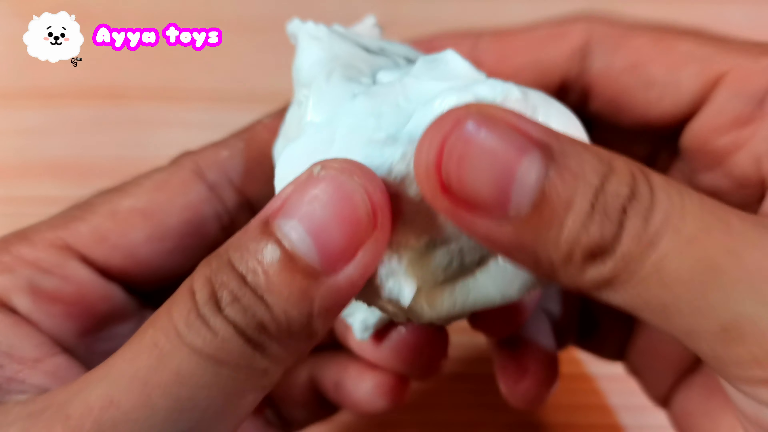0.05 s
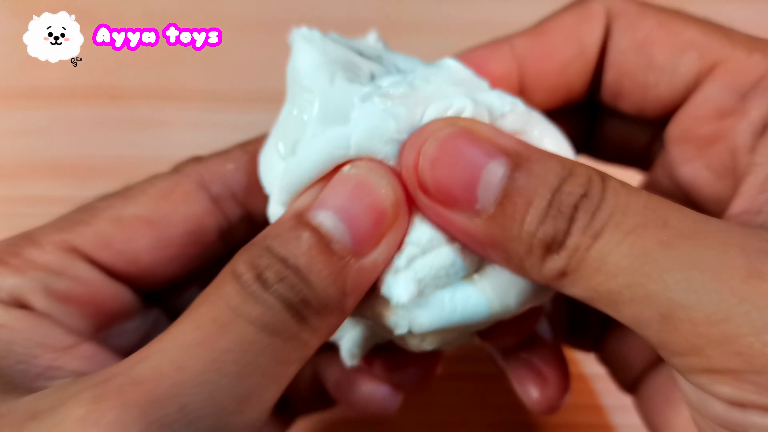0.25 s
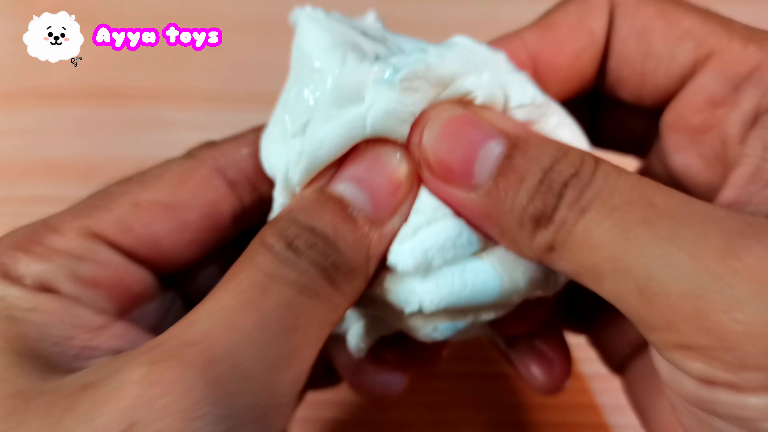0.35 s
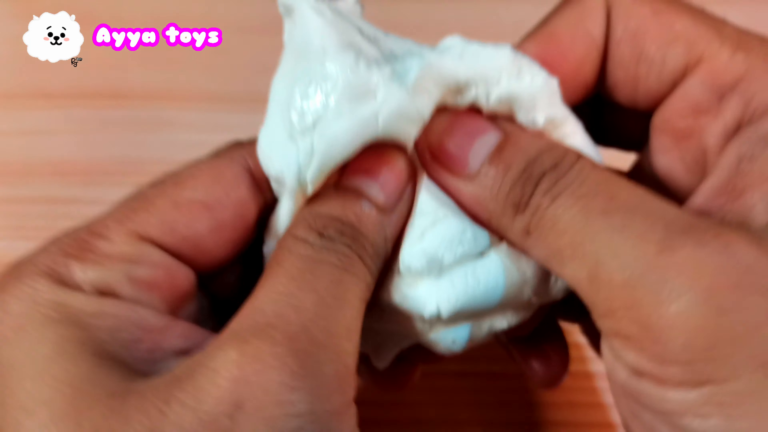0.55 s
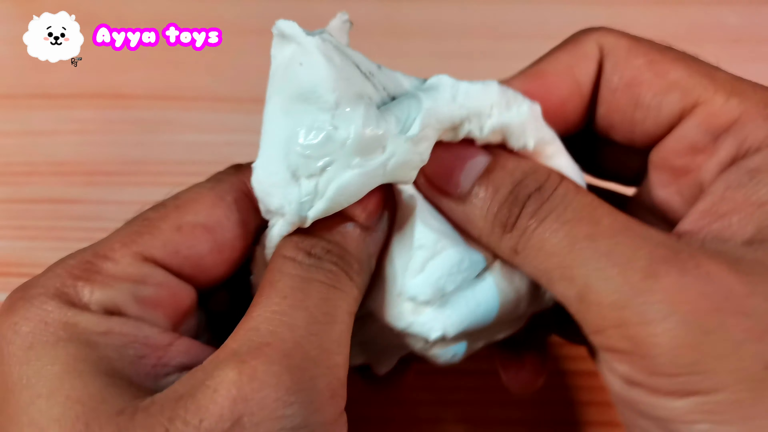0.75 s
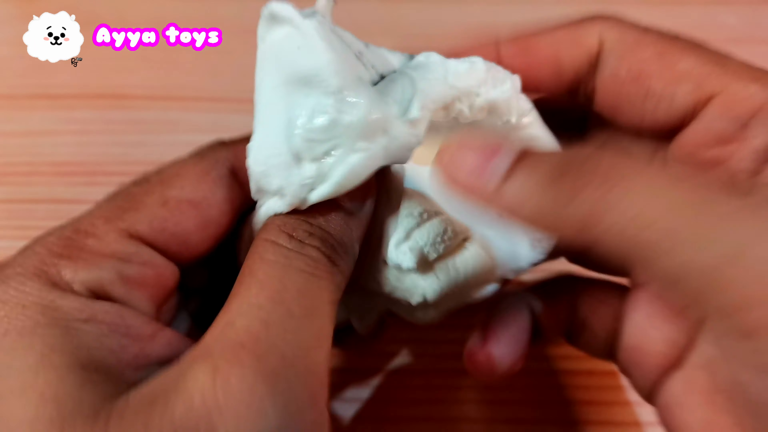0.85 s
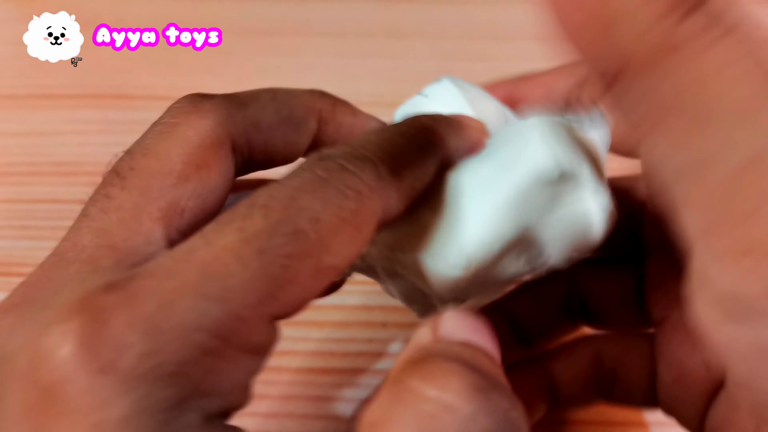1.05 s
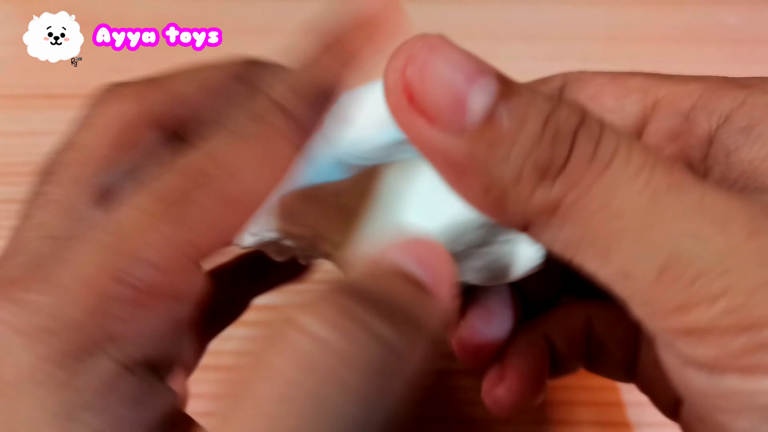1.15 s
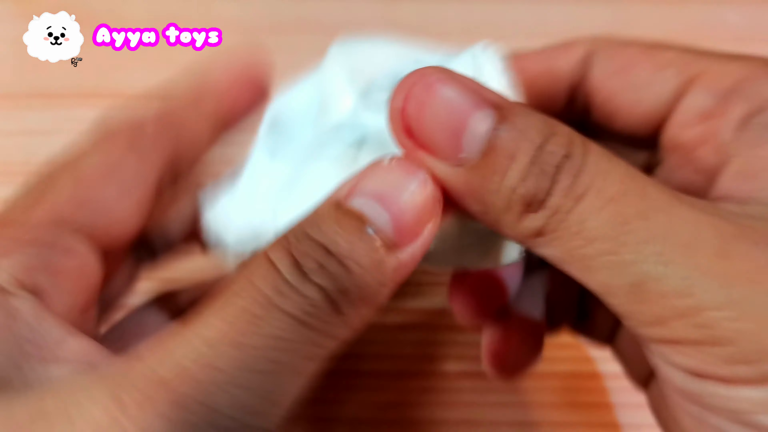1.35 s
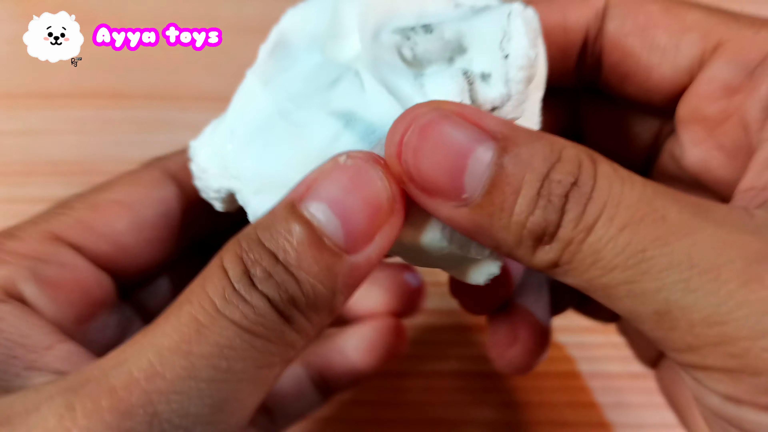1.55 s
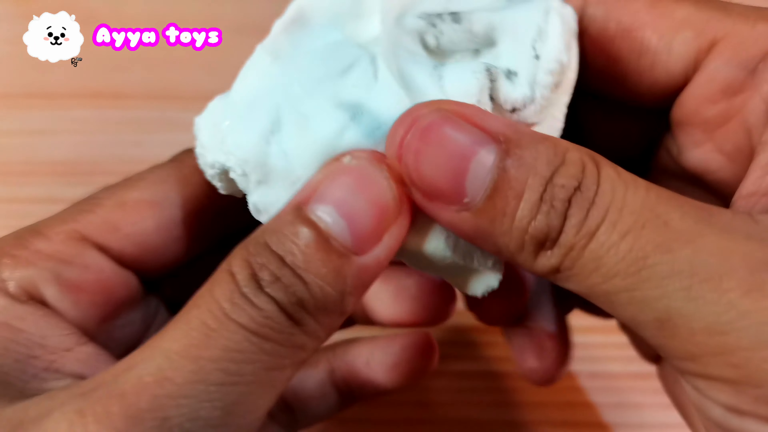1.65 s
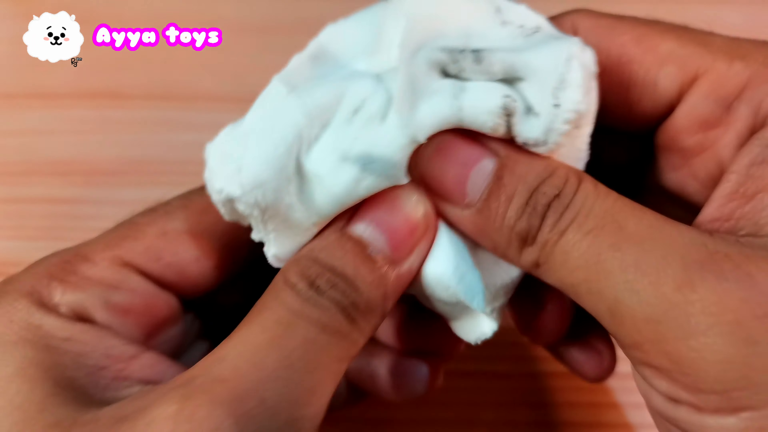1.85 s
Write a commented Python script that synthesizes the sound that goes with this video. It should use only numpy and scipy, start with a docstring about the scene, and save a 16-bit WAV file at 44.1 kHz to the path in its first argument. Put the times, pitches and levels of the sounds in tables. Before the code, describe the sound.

Fingers squeeze and fold soft, sticky clay close to the microphone in a small room. Low bumps give way to a cluster of sharp air pops and crackles, then brief swishes of skin and a few lighter clicks.

```python
"""Soft low bumps over a faint hum and hiss give way to sharp pops: fingers are squeezing and folding
a lump of soft, sticky clay, close by and a little to the left. Trapped air pockets burst and ring as
damped cavity resonators, tiny ones crackle, and skin rubs and peels on the clay as the grip changes.
The hands and a small room reflect each pop."""
import sys
import numpy as np
from scipy import signal
from scipy.fft import rfft, irfft, next_fast_len
from scipy.io import wavfile
from scipy.ndimage import map_coordinates

SR = 44100
rng = np.random.default_rng(int(sys.argv[2]) if len(sys.argv) > 2 else 0)


def wav_record(signal):
    """Record a signal, one row per channel, as 16-bit PCM in the file named by sys.argv[1]."""
    frames = np.transpose(np.atleast_2d(signal))
    bounded = np.clip(frames, -1, 1)
    # unit amplitude maps onto the largest positive 16-bit level
    quanta = np.round(bounded * 32767).astype(np.int16)
    wavfile.write(sys.argv[1], SR, quanta)


N = 83790

# Spectra of the noises. Each row: frequency in Hz, relative level in dB.
RUMBLE_SPECTRUM = [(20, 0), (38, 5.5), (60, 0.5), (80, -2.5), (110, 1), (170, -10.5), (250, -12.5),
                   (400, -26.5), (800, -21.5), (2000, -24.5), (4000, -38), (7000, -44), (16000, -31)]
KNEAD_SPECTRUM = [(60, -30), (150, -12), (210, -4), (255, 5), (315, -5), (410, 1), (540, -7), (900, -15),
                  (2000, -30), (6000, -60)]
SWIPE_SPECTRUM = [(100, -30), (400, -8), (750, 0), (1600, -1), (3400, -3), (4250, 4), (5200, -5),
                  (9000, -3), (15000, -10)]
RUSTLE_SPECTRUM = [(100, -30), (400, -8), (800, -2), (2500, 0), (4300, 0), (5500, -5), (10000, -6),
                   (15000, -13)]
CRACKLE_SPECTRUM = [(200, -30), (1000, -9), (2500, 0), (4300, 0), (5500, -3), (10000, -4), (15000, -11)]
# Tones of the hum. Each row: frequency in Hz, mean level in dB.
HUM_TONES = [(100.5, -64), (122, -65.5)]
# Reverberation of the room. Each row: frequency in Hz, time to decay by 60 dB in seconds.
ROOM_DECAY = [(300, 0.64), (2500, .22), (8000, 0.25), (15000, 0.19)]
# Phase of the direct sound on the right. Each row: frequency in Hz, lag in radians.
RIGHT_PHASE_LAG = [(300, -1), (700, -1), (1100, 1.8), (1700, 1.5), (2500, 1.77), (3000, 1.6), (3500, 4),
                   (4400, 7), (5500, 4.5), (7000, 8.5), (15000, 18)]
# Shifts of grip. Each row: midpoint in seconds, half length in seconds, level in dB, frequency in Hz.
GRIP_BUMPS = [(0.048, 0.032, -52, 90), (0.11, 0.039, -49, 46), (0.445, 0.035, -51, 55),
              (0.774, .025, -49.5, 135), (0.956, 0.067, -59, 139), (1.242, .04, -54, 113),
              (1.367, 0.057, -50.5, 96), (1.56, 0.047, -51.5, 39.5), (1.815, 0.024, -48.5, 65)]
# Envelopes of the low creak and the sticky crackling. Each row: time in seconds, level in dB.
KNEAD_ENVELOPE = [(0, -61.5), (.3, -63.5), (.38, -49.5), (.5, -50), (.6, -61), (.72, -80), (.77, -58.5),
                  (.84, -63), (.95, -63), (1.1, -61), (1.28, -60), (1.5, -63.5), (1.7, -57.5), (1.9, -62.5)]
RUB_ENVELOPE = [(0, -72), (.2, -70.5), (.255, -65.5), (.3, -69), (.38, -56), (.41, -54.5), (.5, -51.5),
                (.58, -59), (.66, -62), (.74, -51), (.8, -68), (.9, -73), (.95, -47), (1, -58),
                (1.025, -64), (1.08, -52), (1.115, -66.5), (1.16, -67.5), (1.265, -64), (1.31, -69),
                (1.45, -75), (1.77, -66.5), (1.82, -60.5), (1.9, -58)]
# Fingertip slides. Each row: peak time, rise width and fall width in seconds, level in dB.
FINGER_SWIPES = [(0.925, 0.0089, 0.0053, -52.5), (.947, .012, 0.014, -37), (0.999, 0.011, 0.02, -43.5),
                 (1.046, 0.0073, 0.021, -42.5), (1.262, 0.0046, 0.012, -46.5), (1.5, 0.033, 0.022, -63),
                 (1.683, 0.0041, 0.0023, -49)]
# The lump giving way. Each row: start in seconds, gain in dB, resonance in Hz.
LUMP_THUDS = [(.4272, -32, 920), (.4802, 10, 900), (.5346, 11, 810), (.5515, 2, 910), (.568, 2, 910),
              (0.9531, 1.5, 1110), (1.0023, -0.5, 835), (1.0475, -20, 775), (1.2649, 4.5, 870)]
# Bursting air pockets. Each row: time in seconds, ring gain in dB, ring frequency in Hz, ring Q,
# snap gain in dB, snap frequency in Hz.
AIR_POCKETS = [(0.2114, 5.5, 1920, 6.1, -2.5, 10500), (.212, 4, 4200, 6.2, -20, 9000),
               (.2217, -29, 2500, 2, -20, 7900), (.3278, -11.5, 2300, 2.1, -5, 8250),
               (0.334, -12.5, 2570, 1.2, -29, 8000), (0.3487, 1.5, 2560, 0.82, -12, 12600),
               (0.4056, -7.5, 2930, 1.6, -29, 8950), (0.4109, -9, 2370, 2.4, -7, 7900),
               (0.4163, -8, 3040, 1.6, -10, 8800), (0.4194, -6, 3000, 2.6, -31, 8000),
               (.4272, 5.5, 2420, 0.41, 4, 7220), (.4605, -6, 3000, 1.3, -11, 7400),
               (0.4638, 9.5, 3240, 2.8, -16, 7440), (.4711, 13, 3130, 4.2, -28, 6000),
               (0.4804, 20.5, 2380, 2.1, -36, 6000), (0.4931, 1, 3000, 2.5, -15, 8000),
               (0.4998, 1.5, 3540, 2.7, -15.5, 7600), (.5029, 10, 4070, 4.1, 3.5, 6900),
               (0.5078, 5.5, 2770, 0.67, -10, 7160), (0.5347, 24.5, 2710, 4.3, -2, 7500),
               (0.5514, 20.5, 2920, 2.8, 6.5, 5500), (.568, 10.5, 3900, 3.4, -4, 6700),
               (0.6367, -1.5, 2700, 2.6, -18, 6500), (0.6621, -15, 3000, 2, -10, 7750),
               (0.6922, 12, 8820, 3.7, -17, 8360), (0.7152, -8.5, 2890, 1.8, -6, 6640),
               (.7186, 13, 2920, 4.4, -2.5, 6600), (0.7569, -1, 5840, 3.3, -20, 6940),
               (0.8153, -7.5, 4300, 3.9, -14, 6500), (0.9435, 1, 2370, 1.5, -3, 7150),
               (0.953, 3, 4300, 2.8, -25, 8000), (0.9672, -6, 3500, 2, -16, 6960),
               (0.994, -12, 2140, 1.1, -36, 6000), (1.0001, -1, 2160, 1.23, -24, 4640),
               (1.0435, -6, 2500, 1.9, -14, 6140), (1.0475, -3, 2040, 1.14, -23, 6300),
               (1.0743, -14, 4260, 2.5, -16, 6900), (1.0935, -14.5, 4600, 1.8, -29, 7760),
               (1.2624, -10.5, 1560, 0.5, -29, 6100), (1.2841, -18, 3920, 6, -22.5, 7300),
               (1.512, -20.5, 3350, 5.9, -37, 8100), (1.8074, -16.5, 2780, 1.2, -22.5, 7400),
               (1.8308, -13, 2700, 4, -49, 8000), (1.8488, -6, 2510, 3.2, -40, 7750),
               (1.8553, 0.5, 3020, 0.97, -14.5, 8400), (1.8989, 1.5, 2400, 4.3, -9.5, 7400)]


def amp(db):
    """Amplitude ratio of a level in decibels."""
    return 10 ** (np.asarray(db) / 20)


def unit_rms(x):
    """Normalisation to a mean power of 1."""
    return x / np.sqrt(np.mean(x ** 2) + 1e-20)


def at_frequency(points, hz):
    """Interpolation on a logarithmic frequency axis."""
    f, values = np.transpose(points)
    return np.interp(np.log(hz + 1), np.log(f + 1), values)


def envelope(rows):
    """Gain per sample, interpolated linearly in decibels."""
    return amp(np.interp(np.arange(N) / SR, *np.transpose(rows)))


def wobble(rate):
    """Random modulation: a spline through `rate` Gaussian values a second."""
    return map_coordinates(rng.standard_normal(N // 20), [np.arange(N) * rate / SR])


def filtered(x, response):
    """Linear filtering: the spectrum is multiplied by a frequency response."""
    size = next_fast_len(N + SR // 2)
    return irfft(rfft(x, size) * response(np.fft.rfftfreq(size, 1 / SR)), size)[..., :N]


def coloured(x, spectrum):
    """Spectral shaping, normalised to rms 1."""
    return unit_rms(filtered(x, lambda hz: amp(at_frequency(spectrum, hz))))


def stereo_noise(apart, left_db):
    """Partial coherence: white noise mixed from a shared and an opposed part, louder on the left."""
    mid, side = rng.standard_normal((2, N))
    return unit_rms(np.array([amp(left_db) * (mid + apart * side), mid - apart * side]))


def background(hiss_hz=2720, hiss_sigma_hz=127):
    """Superposition of room rumble, a hum wavering in level and phase, and narrow-band hiss."""
    t = np.arange(N) / SR
    rumble = amp(-56.5) * coloured(stereo_noise(apart=.36, left_db=6), RUMBLE_SPECTRUM)
    hum = np.zeros(N)
    for hz, db in HUM_TONES:
        peak = np.sqrt(2) * amp(db + 4.7 * wobble(4.84))
        hum += peak * np.sin(2 * np.pi * hz * t + .45 * wobble(6.4))
    noise = stereo_noise(apart=.79, left_db=1)
    hiss = unit_rms(filtered(noise, lambda f: np.exp(-.5 * ((f - hiss_hz) / hiss_sigma_hz) ** 2)))
    return rumble + hum * amp([[2.1], [-2.1]]) + amp(-61.5) * hiss


def reverberation(x):
    """Convolution with the room's diffuse tail, in which each frequency decays at its own rate."""
    hz, t, noise = signal.stft(rng.standard_normal((2, SR // 3)), SR, nperseg=256)
    decay = amp(-60 * t / at_frequency(ROOM_DECAY, hz)[:, None])
    tail = signal.istft(noise * decay, SR, nperseg=256)[1]
    delayed = np.pad(x, (90, 0))  # the room answers 2 ms later
    return signal.fftconvolve(delayed[None], tail / np.linalg.norm(tail[0]), axes=1)[:, :N]


def hand_paths(x, palm_delay_s=.000422, scatter_t60_s=.010, taps=1500):
    """Interference of direct sound, a palm echo on the left and random scatter off the fingers."""
    size = len(x) + taps
    f = np.fft.rfftfreq(size, 1 / SR)
    scatter = rng.standard_normal((2, taps)) * amp(-60 * np.arange(taps) / SR / scatter_t60_s)
    scatter = rfft(scatter / np.linalg.norm(scatter, axis=1, keepdims=True), size)
    left = 1 + .13 * np.exp(-2j * np.pi * f * palm_delay_s)
    right = amp(-12) * np.exp(-1j * at_frequency(RIGHT_PHASE_LAG, f))
    paths = np.array([left, right]) + amp([[-8], [-6.5]]) * scatter
    return irfft(rfft(x, size) * paths)


def bumps(sigma_octaves=.31):
    """Handling noise: each shift of the hands is a flat-topped pulse of low band-pass noise."""
    t, out = np.arange(N) / SR, np.zeros((2, N))
    noise = stereo_noise(apart=.3, left_db=7)
    for middle, half_length, db, hz in GRIP_BUMPS:
        band = filtered(noise, lambda f: np.exp(-.5 * (np.log2((f + 1) / hz) / sigma_octaves) ** 2))
        out += amp(db) * np.exp(-((t - middle) / half_length) ** 4) * unit_rms(band)
    return out


def kneading():
    """Deformation: the mass shifts under the thumbs with a low, uneven creak."""
    creak = coloured(stereo_noise(apart=.42, left_db=3.5), KNEAD_SPECTRUM)
    return envelope(KNEAD_ENVELOPE) * creak * amp(1.5 * wobble(40))


def swipes():
    """Sliding friction: fingertips move to a new grip with swishes that swell and fade."""
    t, swell = np.arange(N) / SR, np.zeros(N)
    for peak_s, rise, fall, db in FINGER_SWIPES:
        width = np.where(t < peak_s, rise, fall)
        swell += amp(db) * np.exp(-.5 * ((t - peak_s) / width) ** 2)
    friction = coloured(stereo_noise(apart=.96, left_db=1.5), SWIPE_SPECTRUM)
    return swell * friction * amp(.87 * wobble(270))


def rubbing(crackles_per_s=600, spread_db=4.5):
    """Adhesion: folds of clay stick and peel, giving random impulses and a rustle under one envelope."""
    impulses = (rng.random(N) < crackles_per_s / SR) * rng.choice([-1, 1], N)
    strength = amp(spread_db * np.minimum(rng.exponential(size=N), 4))
    crackle = coloured(hand_paths(impulses * strength)[:, :N], CRACKLE_SPECTRUM)
    rustle = coloured(stereo_noise(apart=.8, left_db=3.5), RUSTLE_SPECTRUM) * amp(2 * wobble(120))
    return envelope(RUB_ENVELOPE) * (amp(-.5) * crackle + amp(.5) * rustle)


def resonance(f, hz, q):
    """Frequency response of a damped oscillator, with peak gain 1."""
    return 1j * f * hz / q / (hz * hz - f * f + 1j * f * hz / q)


def pops(tear_rise_s=.001, tear_fall_s=.0009, size=1024):
    """Impulse excitation: a pocket's skin tears and snaps, its cavity rings; under some the lump thuds."""
    out, f = np.zeros((2, N)), np.fft.rfftfreq(size, 1 / SR)
    lead = size / 2 / SR  # tearing begins before the burst
    t = np.arange(size) / SR - lead
    burst = np.exp(-2j * np.pi * f * lead)  # spectrum of an impulse at t = 0
    tear_envelope = np.exp(-np.abs(t) / np.where(t < 0, tear_rise_s, tear_fall_s))

    def radiate(time_s, spectrum):
        """Propagation of one event past the hands into the mix."""
        sound = hand_paths(irfft(spectrum))
        span = out[:, round((time_s - lead) * SR):][:, :sound.shape[1]]
        span += sound[:, :span.shape[1]]

    for time_s, ring_db, ring_hz, ring_q, snap_db, snap_hz in AIR_POCKETS:
        microfractures = tear_envelope * rng.standard_normal(size) * rng.exponential(size=size)
        tear = amp(-2) * rfft(microfractures / np.linalg.norm(microfractures))
        high_pass = 1j * f / (1j * f + ring_hz / 4)
        ring = amp(ring_db) * resonance(f, ring_hz, ring_q) * high_pass
        snap = amp(snap_db) * resonance(f, snap_hz, q=1.1) ** 2
        radiate(time_s, ring * (burst + tear / 2) + snap * (burst + tear))
    for time_s, db, hz in LUMP_THUDS:
        radiate(time_s, amp(db) * burst * resonance(f, hz, q=1.2) ** 2)
    return out


def scene():
    """Superposition of the nearby clay, its reverberation, low handling sounds and the background."""
    clay = pops() + rubbing() + swipes()
    return clay + amp(-17.5) * reverberation(clay[0]) + kneading() + bumps() + background()


def record(dry, ceiling=.8, cutoff_hz=16200):
    """Soft saturation rounds off the loudest pops; a low-pass filter limits the bandwidth."""
    rounded = dry / (1 + (dry / ceiling) ** 4) ** .25
    return filtered(rounded, lambda hz: hz < cutoff_hz)


dry = scene()
out = record(dry)
wav_record(out)
```